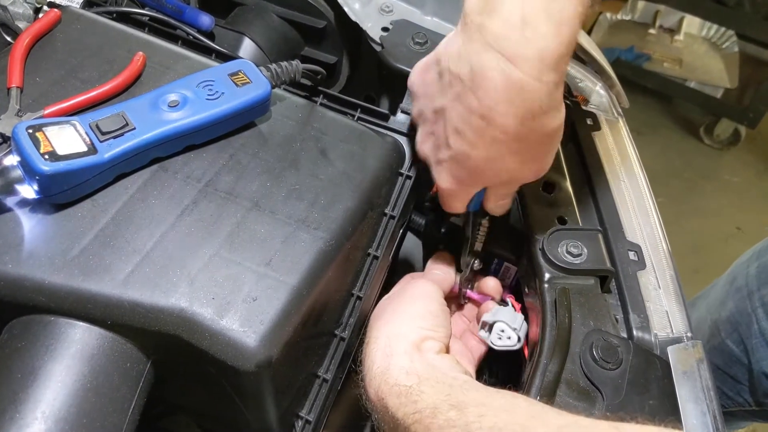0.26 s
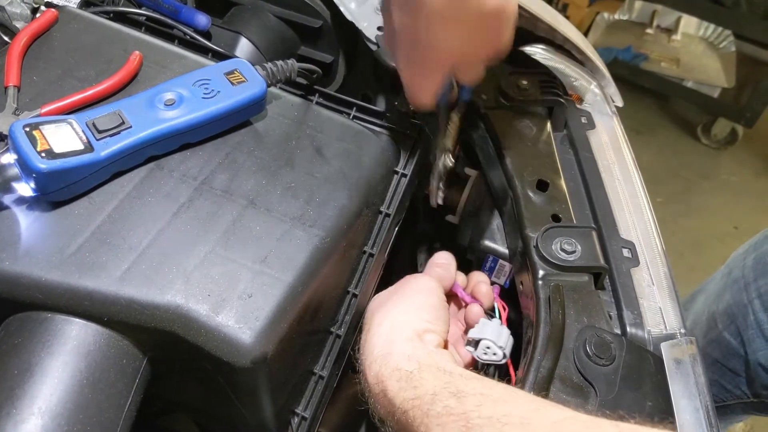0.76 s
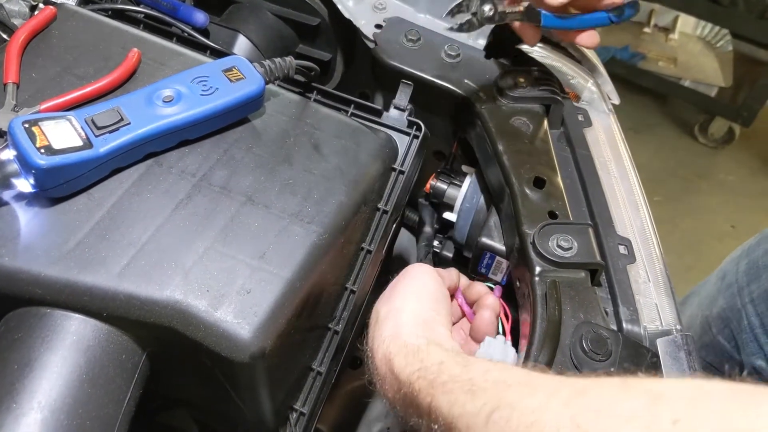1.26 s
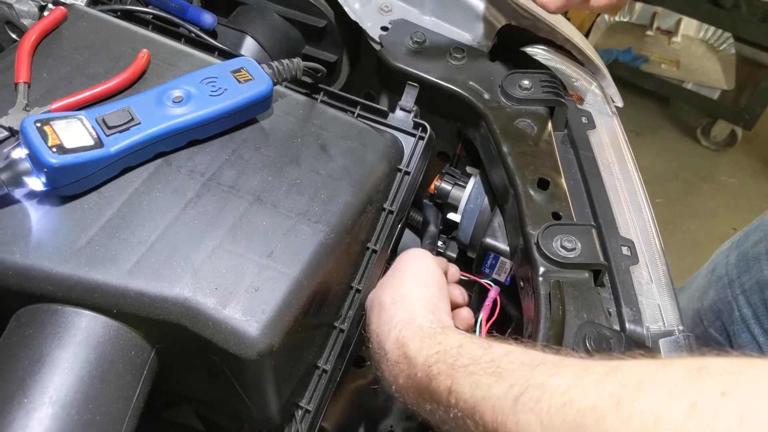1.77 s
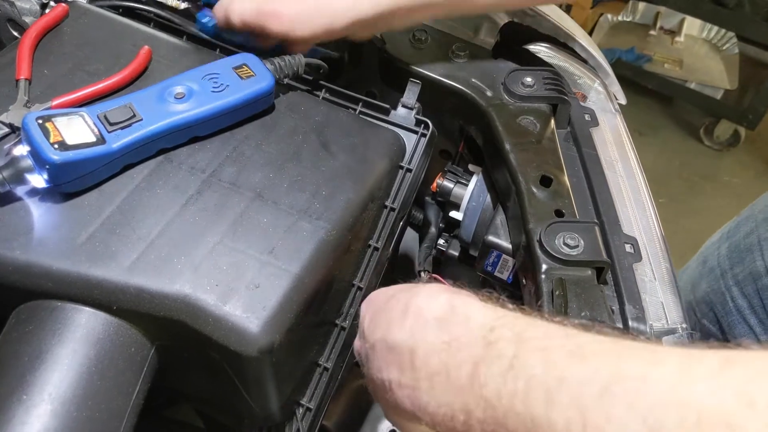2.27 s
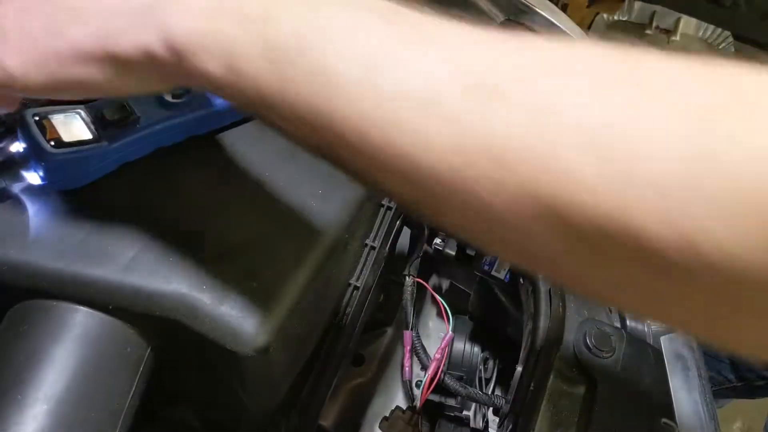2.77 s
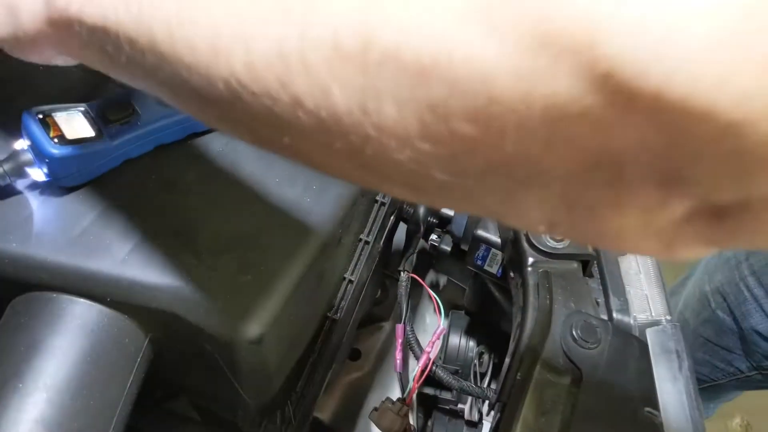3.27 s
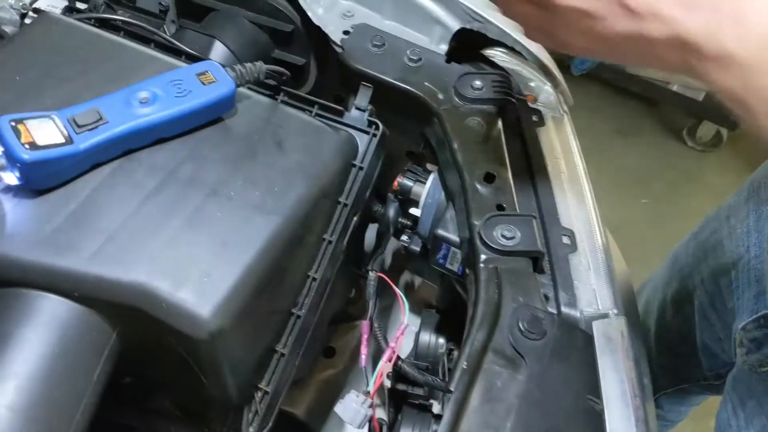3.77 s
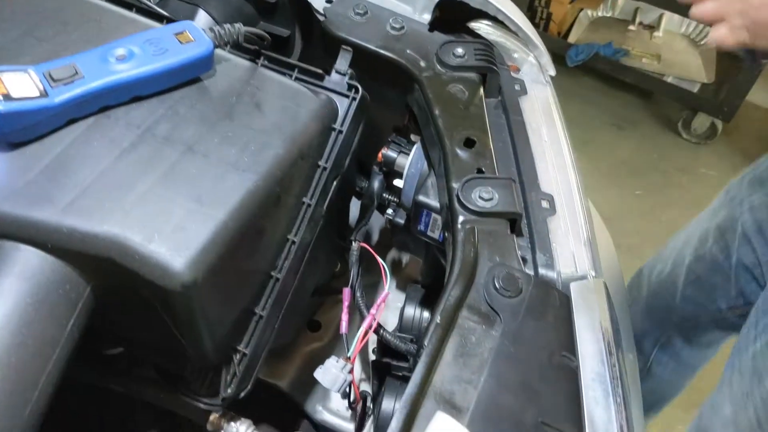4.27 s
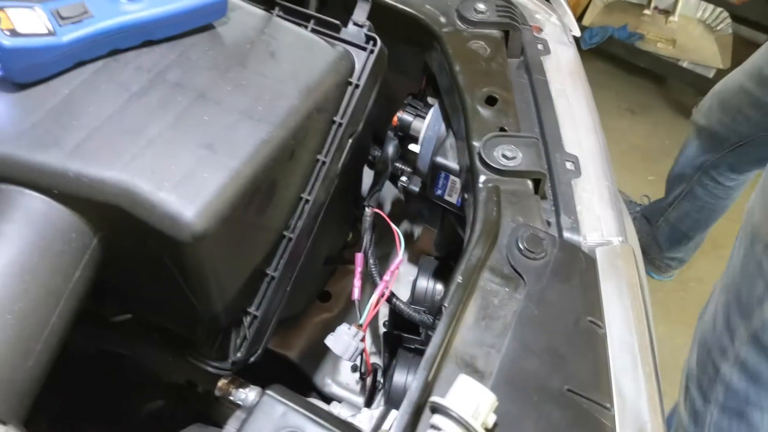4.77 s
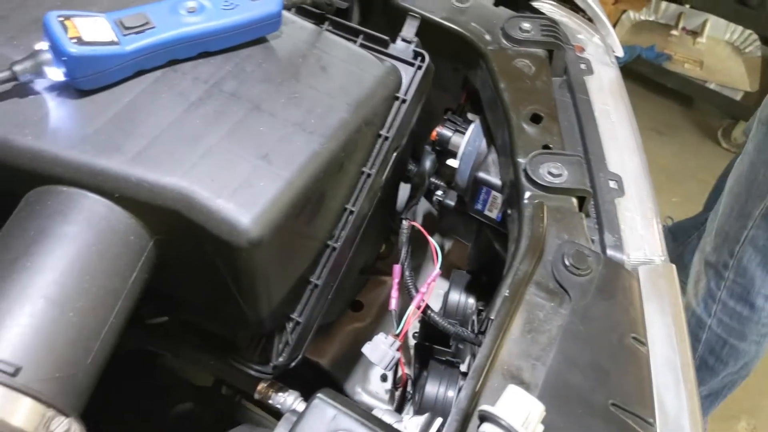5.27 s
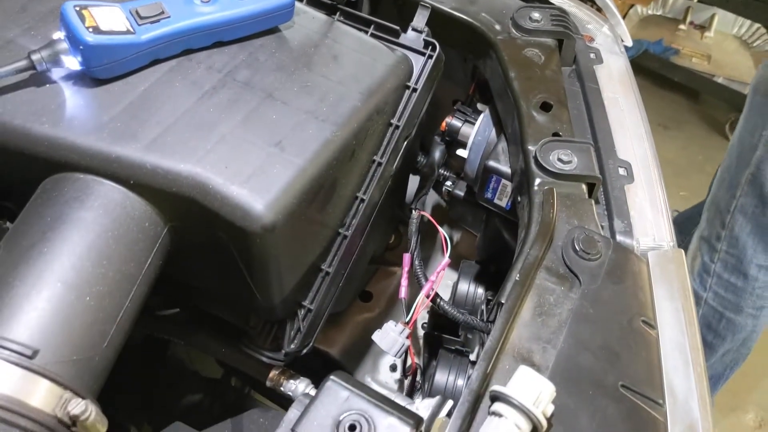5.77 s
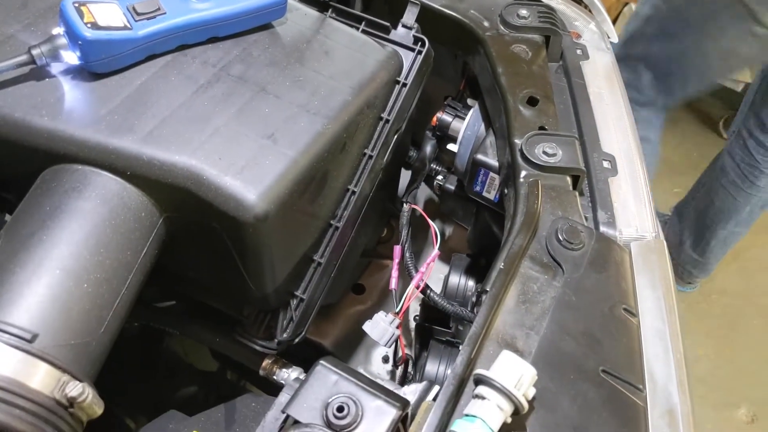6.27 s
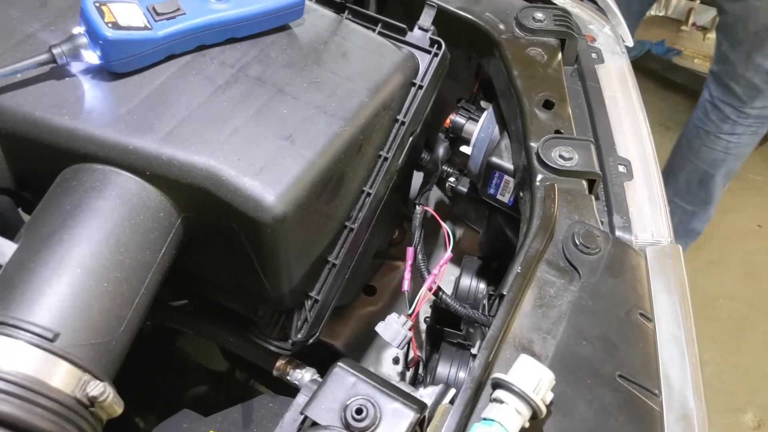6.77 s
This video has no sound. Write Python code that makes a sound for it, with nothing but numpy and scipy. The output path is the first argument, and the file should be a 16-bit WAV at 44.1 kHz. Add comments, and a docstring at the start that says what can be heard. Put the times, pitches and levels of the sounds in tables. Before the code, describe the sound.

Pliers clack and wires rustle close under a car bonnet, hands knock a plastic box, then something hard drops and bounces in an echoing garage.

```python
"""A low hum beats slowly under rubbing and rustling, then pliers clack under a car's bonnet in a garage, close by.
Hands and wires knock on the plastic air box, tool jaws snap, and tools, wires and shoes scuff.
Later something hard drops and bounces, and more things clatter in the echoing room.
Blows are tiny slips that set off clear ringing tones, a noisy wash of dense tones and an echo.
Rubbing, cloth, scuffs and air are shaped noise; the hum is two fan tones at nearly the same pitch."""
import sys
import numpy as np
from scipy import signal
from scipy.fft import rfft, irfft, next_fast_len
from scipy.io import wavfile
from scipy.ndimage import uniform_filter1d

SR = 44100
rng = np.random.default_rng(int(sys.argv[2]) if len(sys.argv) > 2 else 0)


def store_pcm(level_fs):
    """Save levels as 16-bit WAV."""
    pcm = np.round(np.clip(level_fs, -1, 1) * 32767).astype(np.int16)
    wavfile.write(sys.argv[1], SR, np.atleast_2d(pcm).T)


N = 309582
TIME = np.arange(N) / SR
LEAD_S = 0.005  # room kept ahead of a blow for filters that also smear backwards

# How long the garage echoes. Each row: frequency in Hz, time to fade by 60 dB in seconds.
GARAGE_ECHO = [(125, 0.38), (400, 0.77), (1000, 0.81), (2800, 1), (7000, 0.62), (14000, 0.12)]


def undb(db):
    """Turn decibels into gain."""
    return 10 ** (np.asarray(db) / 20)


def unit(x):
    """Scale to an rms (average strength) of 1."""
    return x / np.sqrt(np.mean(x ** 2))


def at_hz(points, hz):
    """Read between (Hz, value) points on a log-frequency axis."""
    f, value = np.transpose(points)
    return np.interp(np.log(np.maximum(hz, 1)), np.log(f), value)


def coloured(x, points):
    """Filter noise by a curve of (Hz, dB) points and scale it to rms 1."""
    size = next_fast_len(len(x))
    gains = undb(at_hz(points, np.fft.rfftfreq(size, 1 / SR)))
    return unit(irfft(rfft(x, size) * gains, size)[:len(x)])


def band(x, lo_hz, hi_hz, order=3):
    """Keep one range of frequencies, working forward in time."""
    edges_hz = [lo_hz, min(hi_hz, SR / 2 - 100)]
    return signal.sosfilt(signal.butter(order, edges_hz, "band", fs=SR, output="sos"), x)


def walk(rate):
    """Wander smoothly at random, about `rate` changes a second, with rms 1."""
    k = max(int(SR / rate), 1)
    steps = np.repeat(rng.standard_normal(N // k + 1), k)
    return unit(uniform_filter1d(uniform_filter1d(steps, k), k)[:N])


def uneven(size, order, spread_db):
    """Random gains that change about every `order` samples."""
    held = np.repeat(rng.standard_normal(size // order + 1), order)[:size]
    return undb(spread_db * unit(uniform_filter1d(held, order)))


def fade(power, t60):
    """Energy that is fed in leaks away by 60 dB in t60 seconds."""
    keep = np.exp(-np.log(10 ** 6) / (t60 * SR))
    return signal.lfilter([1 - keep], [1, -keep], power + 1e-18)


def add(out, s, x):
    """Mix x into out from time s on."""
    i = int(s * SR)
    out[i:i + len(x)] += x[:max(N - i, 0)]


def blow(modes, colour, scrape_s, rise_s, grit_db, ring_db, t60, damping, room_db, patchy_db, rough_db):
    """A first touch and a dying run of tiny slips excite clear modes, a wash of dense ones and the room."""
    size = 2 ** 15
    t = np.arange(size) / SR
    slips = rng.standard_normal(size) * (rng.random(size) < 0.05)
    slips *= np.exp(-t / max(scrape_s, 3e-4)) * (1 - np.exp(-t / rise_s))
    push = undb(grit_db) * slips / np.sqrt(np.sum(slips ** 2) + 1e-12)
    push[0] += 1  # the first touch

    ring = np.zeros(size)
    for k, (hz, db, life_s) in enumerate(modes):
        decay = np.exp(-np.log(1000) * t / life_s)
        ring += (-1) ** k * undb(db) * np.sin(2 * np.pi * hz * t) * decay
    ring = signal.fftconvolve(push, ring)[:size]

    # Dense modes and wall echoes are too many to tell apart: each octave is noise that follows its stored energy.
    bins_hz = np.fft.rfftfreq(size, 1 / SR)
    noise = rfft(rng.standard_normal(size)) * undb(at_hz(colour, bins_hz))
    noise = noise * uneven(len(bins_hz), order=40, spread_db=patchy_db)
    octaves = 125 * 2.0 ** np.arange(8)
    wash = np.zeros(size)
    for hz, mask in zip(octaves, np.eye(len(octaves))):
        # t60 holds at 1000 Hz; damping shortens it above and lengthens it below
        direct = fade(push ** 2, t60 * (octaves[3] / hz) ** damping)
        echo = undb(room_db) ** 2 * fade(fade(direct, 0.15), at_hz(GARAGE_ECHO, hz))
        swell = fade(np.sqrt(direct + echo), 6 / hz)  # a resonance needs part of a cycle to build up
        octave_noise = irfft(noise * at_hz(np.column_stack([octaves, mask]), bins_hz))
        wash += octave_noise * swell
    wash = wash * uneven(size, order=150, spread_db=rough_db)
    return unit(wash) + undb(ring_db) * unit(ring)


def voiced(x, edges_hz, levels_db, lag_s=0):
    """Place and hardness of a blow set each register's peak; bending waves bring the lows later."""
    x = np.pad(x, (int(LEAD_S * SR), 0))
    out = np.zeros(len(x))
    for k, (lo, hi, db) in enumerate(zip(edges_hz, edges_hz[1:], levels_db)):
        backward = band(x, lo, hi)[::-1]
        part = band(backward, lo, hi)[::-1]  # filtering both ways cancels the delay
        late = int(lag_s * SR * (1 - k / 2) ** 2)
        peak = np.sqrt(uniform_filter1d(part ** 2, size=SR // 100).max())  # loudest 10 ms
        out[late:] += part[:len(x) - late] * undb(db) / peak
    return out


def strikes(table, modes, colour, bass_db, mid_db, treble_db, lag_s, **contact):
    """Play a table of blows on one thing, with its own offsets in dB for bass, mids and treble."""
    out = np.zeros(N)
    for s, db, bass, treble, scrape_s in table:
        x = blow(modes, colour, scrape_s, **contact)
        levels_db = db + np.array([bass + bass_db, mid_db, treble + treble_db])
        add(out, s - LEAD_S, voiced(x, (80, 400, 2500, 18000), levels_db, lag_s))
    return out


def pliers():
    """Steel pliers strike the connector and the body panel, which rings and carries the lows later."""
    # Each row: start in seconds, strength in dB, bass and treble in dB against it, scrape decay in seconds.
    clacks = [(0.428, -26, -15, -13, 0.0072), (0.574, -60, -7, -3, 0.003), (0.595, -46, -23, -22, 0.0031),
              (0.691, -40, -10, -10.5, 0.0082), (0.963, -31, -33, -14.5, 0.0052),
              (0.972, -33.5, -27.5, -23, 0.0042), (1.044, -45, -11.5, -22, 0.02),
              (1.078, -36.5, -31, -17.5, 0.0081), (1.134, -46, -37, -23, 0.002)]
    # Clear tones. Each row: frequency in Hz, relative level in dB, time to fade by 60 dB in seconds.
    panel_modes = [(195, -8, 0.37), (282, -16, 0.23), (392.5, -0.5, 0.22), (555, -1.5, 0.34),
                   (645, 9.5, 0.11), (746, 7, 0.24), (915, -1, 0.2), (1360, 8.5, 0.035), (1320, -11, 0.12),
                   (1754, 12, 0.052), (3240, -18, 0.19), (3660, -25, 0.19)]
    # Dense tones of the panel. Each row: frequency in Hz, relative level in dB per Hz.
    panel_colour = [(100, -18), (250, 5.5), (750, 5.5), (1700, -1), (2300, -15.5), (3800, -15.5),
                    (6500, -33.5), (9000, -37.5), (15000, -52)]
    return strikes(clacks, panel_modes, panel_colour, bass_db=3.5, mid_db=-7.5, treble_db=-2.5,
                   lag_s=0.00791, rise_s=0.0054, grit_db=5, ring_db=1, t60=0.11, damping=0.4,
                   room_db=-11.5, patchy_db=3, rough_db=0.5)


def air_box():
    """Hands and wires knock on a plastic box, whose low tones die quickly."""
    # Each row: start in seconds, strength in dB, bass and treble in dB against it, scrape decay in seconds.
    knocks = [(1.711, -63.5, 7.5, -5, 0.0052), (2.293, -24, -3, -7, 0.0018), (2.33, -34, -28, -5, 0.0052),
              (2.602, -40.5, -19, -13, 0.0058), (2.712, -43.5, -8, -5.5, 0.0052),
              (2.893, -42.5, 4, -12, 0.004), (3.108, -37, -10, -14.5, 0.0029),
              (3.212, -36.5, -13.5, -2.5, 0.002), (3.254, -24, -17.5, -14, 0.0034),
              (3.313, -32.5, -15, -1, 0.0027)]
    # Clear tones. Each row: frequency in Hz, relative level in dB, time to fade by 60 dB in seconds.
    box_modes = [(132, -10, 0.113), (163.3, 1, 0.098), (199, -3.5, 0.11), (240, -5.5, 0.075),
                 (444, -10.5, 0.08), (643, -3.5, 0.06), (784, -1.5, 0.023), (958, -4.5, 0.043),
                 (1100, -13, 0.069), (1640, -18.5, .12), (3300, -20.5, 0.04), (4000, -23, 0.078),
                 (4430, -42, 0.13), (5250, -31, 0.054)]
    # Dense tones of the box. Each row: frequency in Hz, relative level in dB per Hz.
    box_colour = [(59, -38), (100, 1), (188, -2.5), (885, -18), (1260, -23), (1590, -21.5), (2000, -29.5),
                  (3920, -32), (15000, -48.5)]
    return strikes(knocks, box_modes, box_colour, bass_db=4, mid_db=-10.5, treble_db=-10,
                   lag_s=0, rise_s=0.00031, grit_db=-6.5, ring_db=1, t60=0.1, damping=0.31,
                   room_db=-13, patchy_db=4, rough_db=3.5)


def snaps():
    """Tool jaws and wire ends make tiny hard contacts: bright and short, and thinner when harder."""
    # Each row: start in seconds, strength in dB, top register in dB against it.
    snap_rows = [(0.5114, -56, -18), (0.5741, -47.5, -17), (0.598, -54, -7), (0.7756, -55, -15),
                 (1.165, -57, -11), (1.7932, -47.5, -17), (1.8362, -51, -9), (1.9052, -53, -16),
                 (1.924, -56, -9), (2.501, -47.5, -32), (2.5496, -59, -5), (2.6545, -52, -20),
                 (3.12, -42.5, -9.5), (3.702, -50, -24), (3.817, -47, -17), (3.8574, -35, -18),
                 (3.9453, -40.5, -5), (4.0513, -31, -15), (4.1025, -46, -16), (4.1685, -28.5, -10.5)]
    # Clear tones. Each row: frequency in Hz, relative level in dB, time to fade by 60 dB in seconds.
    jaw_modes = [(3920, 8, 0.0062), (6060, 0, 0.026), (7400, -13, 0.091), (9040, 12.5, 0.03),
                 (12000, 7.5, 0.017), (14600, -7, .03)]
    # Dense tones of the jaws. Each row: frequency in Hz, relative level in dB per Hz.
    jaw_colour = [(290, -93), (500, -11), (1960, -10), (2840, -4), (3850, 11), (4840, 1), (15500, 11.5)]
    middling_db, mids_db, thinning = -44.5, -18, 0.54  # thinning: mids lost in dB per dB of strength
    out = np.zeros(N)
    for s, db, top in snap_rows:
        mid = mids_db - thinning * (db - middling_db)
        x = blow(jaw_modes, jaw_colour, scrape_s=0.00084, rise_s=0.00064, grit_db=-3, ring_db=-12.5,
                 t60=0.092, damping=0.2, room_db=-11, patchy_db=5.5, rough_db=1.5)
        levels_db = db + np.array([mid, -12, top])
        add(out, s - LEAD_S, voiced(x, (400, 2500, 8000, 18000), levels_db))
    return out


def scuffs():
    """Friction of tools, wires and shoes: uneven grains swell in one resonance, with a little room after."""
    # Mostly brief and broad, but two late scrapes are longer and narrow, almost pitched.
    # Each row: start in seconds, length in seconds, centre in Hz, width in Hz, level in dB.
    scuff_rows = [(0.174, 0.2, 12900, 5000, -73.5), (0.177, 0.077, 1020, 1230, -63.5),
                  (0.284, 0.11, 228, 158, -58.5), (0.678, 0.013, 2400, 1400, -51.5),
                  (0.689, 0.03, 2470, 805, -46.5), (.686, 0.06, 676, 450, -48),
                  (0.933, 0.035, 870, 900, -60), (1.042, 0.025, 11300, 2470, -60),
                  (1.678, 0.15, 10800, 4970, -72), (1.789, 0.029, 2920, 614, -57),
                  (1.9, 0.023, 1160, 1500, -58), (2.3, 0.072, 3800, 2060, -46.5),
                  (2.355, 0.057, 715, 600, -52.5), (2.903, 0.038, 680, 446, -42.5),
                  (2.924, 0.045, 7300, 8200, -60.5), (3.041, 0.047, 820, 520, -56),
                  (3.127, 0.1, 800, 695, -54), (3.837, 0.043, 11940, 1500, -52.5),
                  (4.58, 0.033, 690, 1100, -67.5), (4.772, 0.035, 450, 1010, -62),
                  (6.574, 0.29, 1009, 110, -52.5), (6.901, 0.5, 740, 112, -48)]
    room_db = -15
    out = np.zeros(N)
    t = np.arange(SR // 2) / SR
    for s, length_s, hz, width, db in scuff_rows:
        force = np.sin(np.pi * np.minimum(t / length_s, 1) ** 0.43) ** 2  # rises faster than it falls
        power = force + undb(room_db) ** 2 * fade(force, at_hz(GARAGE_ECHO, hz))
        grains = rng.standard_normal(len(t)) * uneven(len(t), order=90, spread_db=3)
        lo = np.hypot(hz, width / 2) - width / 2  # puts hz at the band's middle on a log axis
        add(out, s, undb(db) * unit(band(grains, lo, lo + width)) * np.sqrt(power))
    return out


def dropped_thing():
    """A hard thing bounces on the floor further off, with a strong echo."""
    # Each row: start in seconds, strength in dB, bass and treble in dB against it, scrape decay in seconds.
    bounces = [(5.094, -47, -2, -6.5, 0.0056), (5.119, -23.5, -2.5, -14, 0.0088),
               (5.134, -28, -17, -7, 0.015), (5.164, -37.5, -11, -4, 0.15),
               (5.297, -26.5, -2.5, -9.5, 0.013), (5.324, -37.5, 2, -3.5, 0.08),
               (5.454, -27.5, -7, -14.5, 0.0068), (5.524, -41.5, -28, -8.5, 0.01)]
    # Clear tones. Each row: frequency in Hz, relative level in dB, time to fade by 60 dB in seconds.
    dropped_modes = [(243, -6, .25), (265, -1, .35), (322, -6, .3), (378, -3, .3), (640, -5, .15),
                     (1005, -6, .2), (1210, -6, .18), (1350, -7, .18), (1660, -7, .15)]
    # Its dense tones. Each row: frequency in Hz, relative level in dB per Hz.
    dropped_colour = [(100, -9.5), (180, -10), (260, 0.5), (370, 4.5), (500, -3), (1200, -1), (2200, -13.5),
                      (3900, -22), (6500, -30.5), (15500, -35)]
    return strikes(bounces, dropped_modes, dropped_colour, bass_db=-5, mid_db=-9.5, treble_db=-4,
                   lag_s=0.0022, rise_s=0.0064, grit_db=6, ring_db=-6.5, t60=0.13, damping=0.029,
                   room_db=-2.5, patchy_db=1.5, rough_db=0.5)


def clatter():
    """Things shifted across the room knock together, with the strongest echo of all."""
    # Each row: start in seconds, strength in dB, bass and treble in dB against it, scrape decay in seconds.
    clatters = [(6.108, -54.5, -12.5, -8.5, 0.016), (6.359, -61.5, -14, -1.5, 0.016),
                (6.542, -51.5, -0.5, -4, 0.066), (6.584, -44.5, -10, -9.5, 0.024),
                (6.631, -36.5, -16, -0.5, 0.0037), (6.863, -40.5, -17.5, -6, 0.016),
                (6.946, -32.5, -17.5, 0, 0.0063), (6.974, -40, -11.5, 2.5, 0.018)]
    # Clear tones. Each row: frequency in Hz, relative level in dB, time to fade by 60 dB in seconds.
    clatter_modes = [(264.9, -7, 1), (380.5, 0, 0.48), (688, 7, 0.17), (780, -10, 0.22), (824, 7, 0.17),
                     (1027, 3, 0.99), (1060, -5, 0.25)]
    # Their dense tones. Each row: frequency in Hz, relative level in dB per Hz.
    clatter_colour = [(88, -47), (150, -18), (258, -14), (561, -4), (781, 2.5), (2450, -4.5), (5440, -17.5),
                      (6470, -23), (9540, -22), (15500, -29.5)]
    return strikes(clatters, clatter_modes, clatter_colour, bass_db=-2, mid_db=-8, treble_db=-8,
                   lag_s=0.0023, rise_s=0.0043, grit_db=4, ring_db=-10.5, t60=0.074, damping=0.073,
                   room_db=2.5, patchy_db=2.5, rough_db=-0.5)


def strokes(table):
    """Level of a hand or limb in motion: each stroke swells to its fastest moment and dies away."""
    shape = 1.32  # 1 is a pointed swell, 2 a rounded one
    power = 1e-12
    for s, rise_s, fall_s, db in table:
        away = np.maximum((s - TIME) / rise_s, (TIME - s) / fall_s)
        power = power + (undb(db) * np.exp(-away ** shape)) ** 2
    return np.sqrt(power)


def friction_grains():
    """Noise whose samples vary strongly in strength, like many tiny catches."""
    strength_db = 2.2 * np.minimum(rng.exponential(size=N), 7)
    return rng.standard_normal(N) * undb(strength_db)


def skin_rub():
    """Skin rubs dully on wires and plastic, with wandering pressure."""
    # Each row: fastest moment in seconds, rise in seconds, fall in seconds, relative level in dB.
    rub_rows = [(0.15, 0.13, 0.34, -58), (0.6, 0.36, 0.27, -54), (1.88, 0.18, 0.11, -57),
                (2.68, 0.17, 0.068, -56.5), (3.25, 0.12, 0.14, -46.5), (4.05, 0.23, 0.42, -65.5),
                (4.78, 0.17, 0.13, -58.5)]
    # Dull tone of the rubbing. Each row: frequency in Hz, relative level in dB.
    rub_colour = [(100, -1.5), (200, 3), (700, -1), (1300, -19.5), (2500, -40), (6000, -36)]
    press_db = 1.5 * walk(30)
    return coloured(friction_grains(), rub_colour) * strokes(rub_rows) * undb(press_db - 5)


def cloth():
    """Sleeves and trouser legs hiss in fine, uneven grains."""
    # Each row: fastest moment in seconds, rise in seconds, fall in seconds, relative level in dB.
    sweep_rows = [(0.3, 0.57, 0.5, -66), (1.5, 0.7, 0.28, -71.5), (2.94, 0.048, 0.034, -56),
                  (3.23, 0.14, 0.04, -56.5), (3.8, 0.23, 0.25, -60.5), (4.12, 0.29, 0.16, -53.5),
                  (4.97, 0.46, 0.2, -63.5)]
    # Hiss of the cloth. Each row: frequency in Hz, relative level in dB.
    cloth_colour = [(500, -11), (1300, -4.5), (2900, -6.5), (3850, 1.5), (4800, -8.5), (7400, -11.5),
                    (10000, -18), (15500, -23)]
    press_db = 0.45 * walk(45)
    return coloured(friction_grains(), cloth_colour) * strokes(sweep_rows) * undb(press_db - 4)


def fan_hum():
    """Two fan motors run at nearly the same speed, so their hum beats as they drift in and out of step."""
    hum_hz, start_db, sag_db_per_s, waver_db = 54.75, -50.5, 0.82, 1.7
    second_fan_db = -7  # against the first
    beat_s, beat_low_at_s = 0.753, 2.988
    turns = np.cumsum(hum_hz * (1 + 0.01 * walk(3))) / SR
    behind = (TIME - beat_low_at_s) / beat_s
    first = np.sin(2 * np.pi * turns)
    second = undb(second_fan_db) * np.sin(2 * np.pi * (turns - behind))
    level_db = start_db - sag_db_per_s * TIME + waver_db * walk(10)
    return np.sqrt(2) * (first - second) * undb(level_db)


def room_drones():
    """Narrow bands of noise sound like low room resonances beside the hum."""
    # Each row: centre in Hz, width in Hz, level in dB.
    drone_rows = [(35.3, 3.3, -71), (74.6, 6, -59.5), (109, 15, -84)]
    out = np.zeros(N)
    for centre, width, db in drone_rows:
        noise = rng.standard_normal(N + SR)
        settled = band(noise, centre - width / 2, centre + width / 2, order=2)[SR:]
        out += undb(db) * unit(settled)
    return out


def air_hiss():
    """Moving air is a smooth, steady noise, strongest in the lows."""
    # Each row: frequency in Hz, relative level in dB.
    air_colour = [(15, -5.5), (25, -8.5), (69, -1.5), (93, -5.5), (129, -15), (227, -22), (537, -27.5),
                  (741, -30), (2300, -43.5), (3440, -36), (4870, -45.5), (5580, -41.5), (6550, -48),
                  (15500, -47)]
    air = coloured(rng.standard_normal(N), air_colour)
    return air / np.std(band(air, 186, 14000)) * undb(-69.5)  # level within 186-14000 Hz


def scene():
    """Near things are fairly dry; the dropped thing and the clatter carry much more room."""
    near = pliers() + air_box() + snaps() + skin_rub() + cloth()
    far = dropped_thing() + clatter()
    background = fan_hum() + room_drones() + air_hiss()
    return (near + scuffs() + far + background)[None]


def record(dry):
    """The microphone's port ripples the treble, and everything above 16 kHz is cut."""
    # Peaks of the port. Each row: frequency in Hz, width in Hz, boost in dB.
    port_peaks = [(3400, 210, 1), (5710, 360, 7), (7530, 320, 4.5), (9660, 250, 6), (11650, 310, 6)]
    out = dry
    for hz, width, db in port_peaks:
        peak = signal.lfilter(*signal.iirpeak(hz, hz / width, fs=SR), dry)
        out = out + (undb(db) - 1) * peak
    return signal.sosfilt(signal.ellip(10, 0.2, 70, 16000, fs=SR, output="sos"), out)


dry = scene()
out = record(dry)
store_pcm(out)
```